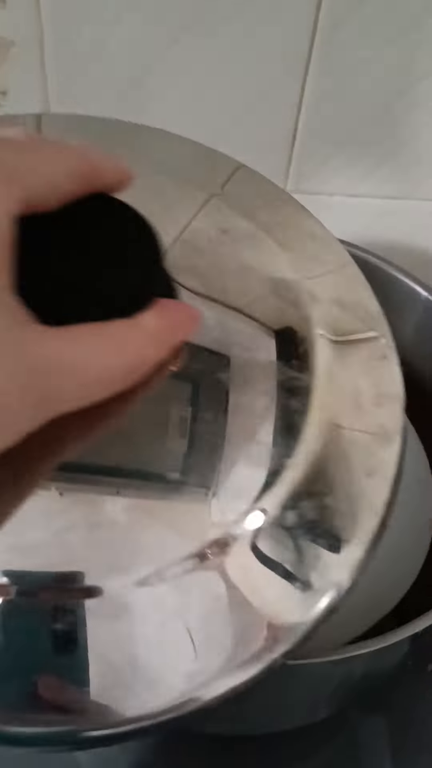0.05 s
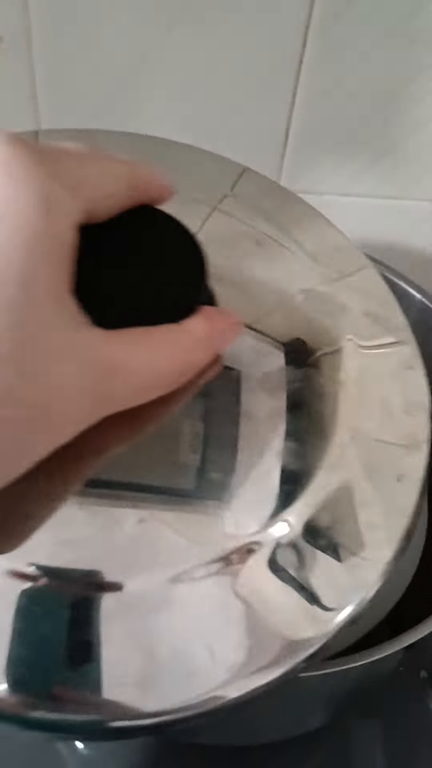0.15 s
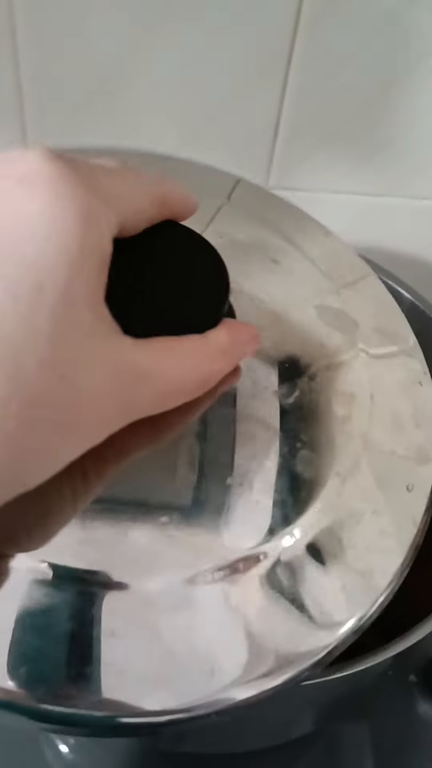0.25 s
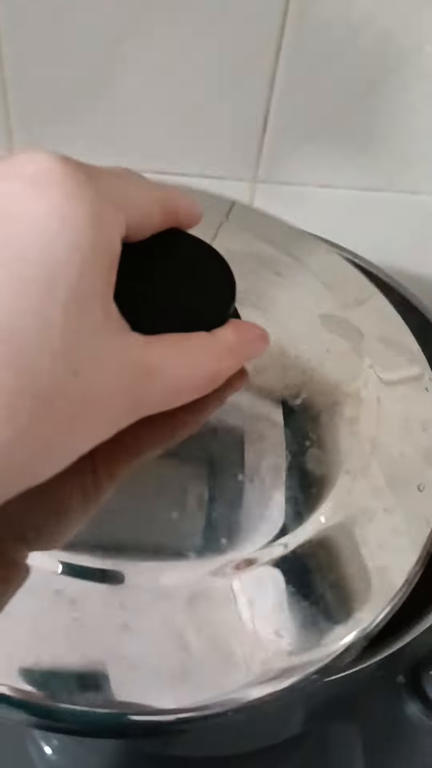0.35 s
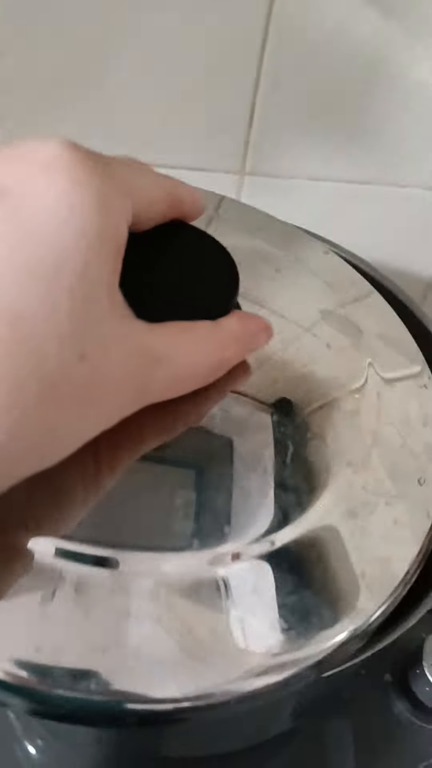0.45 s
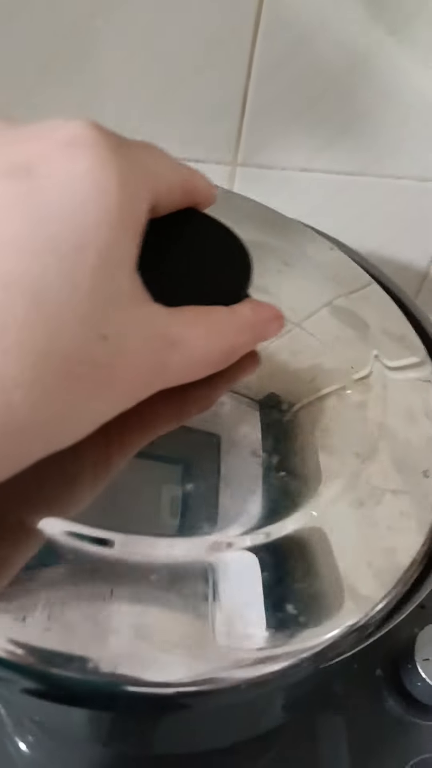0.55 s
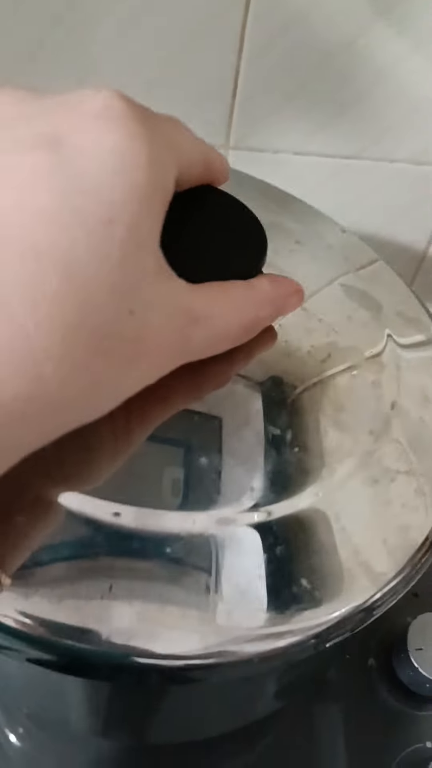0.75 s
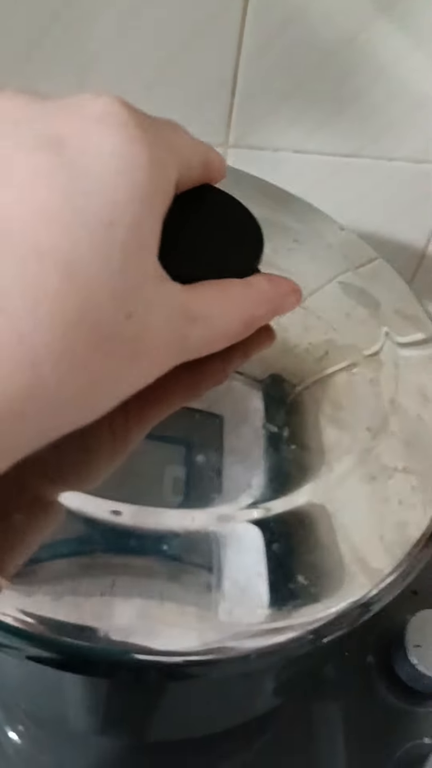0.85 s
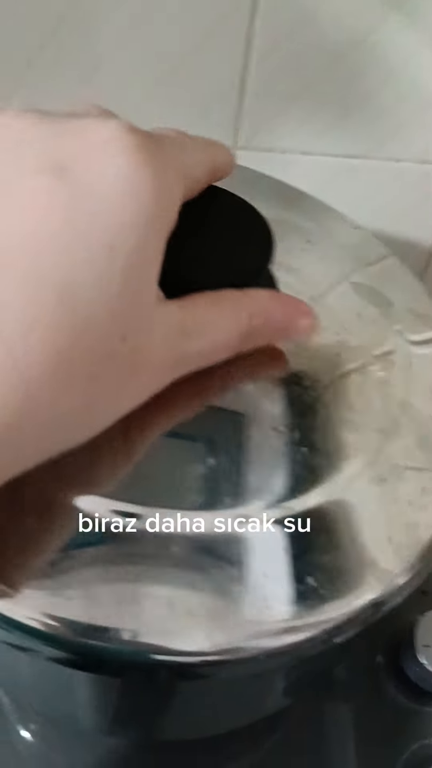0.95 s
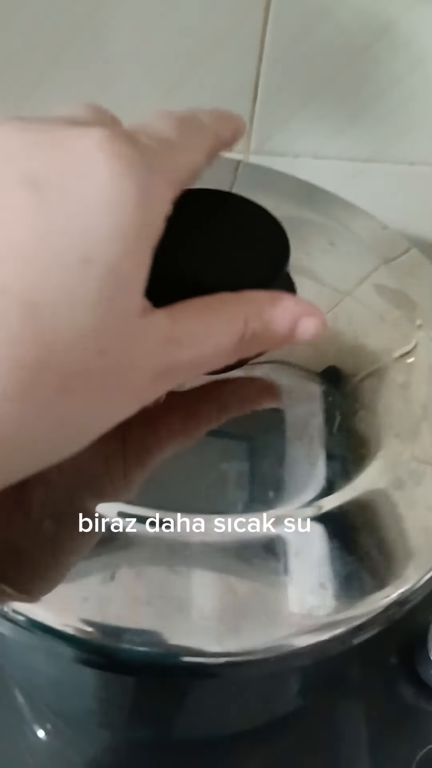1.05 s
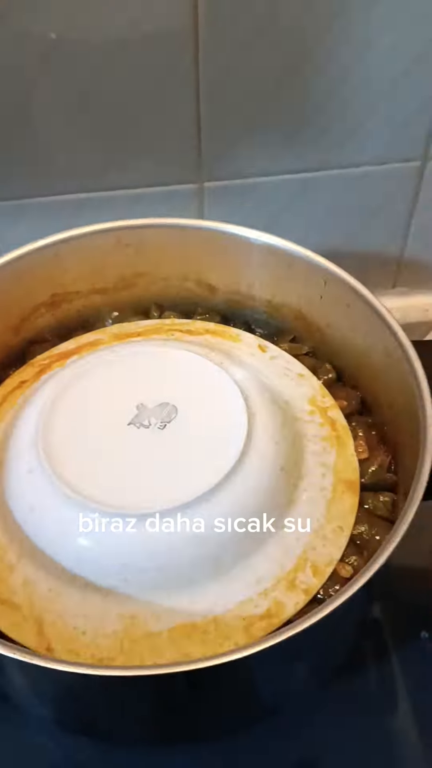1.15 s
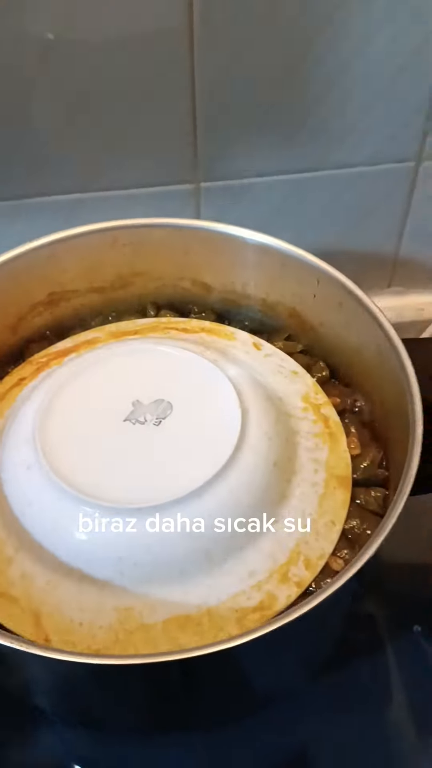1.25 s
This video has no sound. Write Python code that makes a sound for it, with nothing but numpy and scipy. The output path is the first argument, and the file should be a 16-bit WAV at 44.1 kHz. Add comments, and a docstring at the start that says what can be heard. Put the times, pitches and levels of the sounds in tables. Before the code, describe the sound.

A steel lid clanks on a pot's rim at about 0.25 and 0.4 seconds, then seats at 0.7, close by in a kitchen. The metal rings brightly between contacts while a hollow note falls. Faint nudges follow until 1 second, over soft stove hum and hiss. After a short dead silence, a quiet simmering rumble with a few tiny bubble pops runs from 1.15 to 1.3 seconds.

```python
"""A steel lid, held by its knob, is set on a pot in a tiled kitchen: two clinks on the rim, a third as it
seats, then small nudges. Each contact is a noisy clank; lid and pot ring between the blows, and the hollow note
of the air in the pot falls as the gap closes. The stove hums and hisses underneath. After a short silence the
scene changes: an open pot simmers with a low rumble and a few bursting bubbles."""
import sys
import numpy as np
from scipy import signal
from scipy.fft import rfft, irfft
from scipy.io import wavfile
from scipy.ndimage import uniform_filter1d

SR = 44100
rng = np.random.default_rng(int(sys.argv[2]) if len(sys.argv) > 2 else 0)


def materialize(psi):
    """Save the field psi as 16-bit PCM at rate SR to the path in sys.argv[1].

    A 1-D psi becomes a single channel; in a 2-D psi each row is a channel.
    """
    bounded = np.clip(np.atleast_2d(psi).T, -1, 1)
    quanta = np.round(bounded * 32767).astype(np.int16)
    wavfile.write(sys.argv[1], SR, quanta)


N = 57330
T = np.arange(N) / SR
FREQS = np.fft.rfftfreq(2 * N, 1 / SR)

# Levels are relative within a layer; pan is left minus right.
# tone of the stove's steady bed (frequency [Hz], level [dB])
STOVE_EQ = [(30, -33.5), (60, -12), (95, -3), (135, 1), (200, -13), (300, -10), (480, -18), (750, -24.5),
            (1100, -14.5), (1400, -23), (2100, -15), (2700, -23.5), (3600, -25), (5200, -29), (6000, -28),
            (8000, -23.5), (10000, -26), (12500, -30), (15000, -28.5)]
# its stereo lean (frequency [Hz], pan [dB])
STOVE_PAN = [(100, 1), (400, -1.5), (1300, -3), (2400, -4), (4400, -2.5), (8100, -17.5), (11000, 4),
             (15000, 2)]
# whistling bands in the hiss (centre [Hz], half-width [Hz], level [dB], pan [dB])
HISS_BANDS = [(1680, 83, -59.5, 0), (2260, 150, -65, -2), (4266, 150, -59.5, -5.5), (6737, 71, -56.5, -10)]
# hiss ducking under the blows as the recorder's gain drops, then coming back (time [s], level [dB])
HISS_DUCKING = [(0, 3), (.2, 5), (.4, -5), (.55, 8.5), (1.0, 8)]

# lid meets pot (time [s], clank [dB], treble shelf [dB], ring-out t60 [s], air note [dB])
BLOWS = [(.2430, 2.5, -6.5, 0.78, -8.5), (0.3812, 1, -3, 0.37, -13.5), (0.6903, -1.5, -2, .19, -19)]
# light chatter and nudges (time [s], clank [dB], treble shelf [dB], ring-out t60 [s], air note [dB])
TOUCHES = [(0.2564, -3, -14.5, 0.042, -37.5), (0.6867, -10.5, 0.5, 0.3, -30),
           (0.7019, -13, -11.5, 0.21, -24), (.836, -28.5, -11, 0.15, -32), (0.965, -26, -21.5, .12, -34.5),
           (0.989, -26.5, -9.5, .12, -39.5)]
# tone of a clank (frequency [Hz], level [dB])
CLANK_EQ = [(40, -78), (100, -56), (170, -59.5), (300, -49), (620, -50.5), (850, -48), (1200, -44.5),
            (1750, -49.5), (2250, -35.5), (2650, -52), (3000, -46), (3400, -58.5), (5000, -59), (6000, -63),
            (7300, -59), (9500, -65.5), (13000, -58), (15800, -61)]
# its stereo lean (frequency [Hz], pan [dB])
CLANK_PAN = [(150, 4), (400, -10), (650, 11.5), (1000, -1.5), (2000, 1.5), (3000, -6.5), (5000, -10.5),
             (8000, -14.5), (10000, 3), (13000, 7), (16000, -6.5)]
# modes of the lid against the rim, the lowest being thuds of the whole pot
# (frequency [Hz], t60 [s], pan [dB], fade-in [s], level at blow 1 [dB], at blow 2 [dB], at blow 3 [dB])
LID_MODES = [(99, 0.19, 1.5, 0.0092, -46, -51, -29), (160.8, 0.16, 2, .005, -22, -25, -33),
             (277.6, 0.17, 0.5, 0.0056, -30.5, -49, -27), (318.4, 0.1, 1, .003, -26, -42.5, -29),
             (739.6, 0.15, 3.5, .002, -20, -28, -51.5), (988, 0.13, -5.5, 0.0082, -46.5, -39.5, -22.5),
             (1134, 0.16, -9, 0.0017, -29.5, -37, -50.5), (1623, 0.4, 3.5, 0.0031, -31.5, -34.5, -36.5),
             (1785, .8, -7, 0.011, -42.5, -38.5, -52.5), (1930, 1, -4, 0.069, -22.5, -24.5, -39),
             (2088, 0.16, -5.5, 0.028, -26.5, -33.5, -7.5), (2210, .25, -11, .01, -33.5, -14.5, -45),
             (2220, 0.22, -7.5, 0.35, 17.5, -1, -10.5), (2264, 0.38, 0, 0.024, -29, -12.5, -42.5),
             (2333, 0.33, 3.5, 0.13, -9, -18.5, -43.5), (2443, 0.1, -10.5, 0.0045, -40.5, -26.5, -19),
             (2959, 0.14, -6, 0.0056, -20, -12.5, -57.5), (4300, .05, -6, .002, -44, -39.5, -23.5),
             (5015, .06, -9.5, .002, -49, -29, -23), (5400, .05, -6.5, .002, -43.5, -37.5, -23)]
# thin high overtones of the lid (frequency [Hz], level [dB])
LID_OVERTONES = [(4996, -34), (5075, -36.5), (5577, -46.5), (6019, -41), (6535, -38), (7300, -36),
                 (7460, -41.5), (7628, -51.5), (8333, -45), (9145, -46.5), (9819, -48), (11483, -45.5),
                 (12086, -57), (12565, -52.5), (13749, -52.5), (14998, -46)]
# the lid's main tone, a close pair that beats (frequency [Hz], pan [dB], level [dB])
WOBBLE_PAIR = [(2047.6, -1, -5), (2072.5, -2, 0)]
# strength of the pair at each blow (level [dB])
WOBBLE_DRIVE = [-3.5, 9, -23]
# pot modes, free until the lid closes (frequency [Hz], t60 [s], pan [dB], fade-in [s], choke time [s],
# pitch rise after blow 1 [fraction], level at blow 1 [dB], at blow 2 [dB])
POT_MODES = [(204.6, 2.5, -7, .06, 0.89, 0.006, -49, -40.5), (663.5, 1.08, 4.5, 0.72, .665, .06, -12, -8.5),
             (1306, 0.84, -12, 1, 0.663, 0.075, -14, 0), (2898, 1.5, -13, .03, .625, 0.037, -27.5, -34.5),
             (3902, 0.84, -10, 0.0083, .62, 0.0051, -27.5, -30)]

# air note, falling as the gap closes (time [s], pitch [Hz])
AIR_PITCH = [(.24, 592), (.39, 544.3), (.5, 510), (.69, 428), (.85, 397), (1.0, 370.6)]
# its breathy rush between blows (time [s], level [dB])
AIR_ENVELOPE = [(.2, -70), (.26, -42), (.43, -35), (.52, -42), (.6, -49), (.67, -48), (.71, -41),
                (.77, -52), (1.0, -52)]
# its drift from left to right (time [s], pan [dB])
AIR_PAN = [(.24, 2.5), (.45, 5.5), (.69, -8), (1.0, -8)]

# tone of the simmer (frequency [Hz], level [dB])
SIMMER_EQ = [(18, -58.5), (30, -36), (59, -51), (90, 3.5), (189, -15.5), (245, -0.5), (280, -16.5),
             (374, -8), (415, -15), (1130, -26.5), (1350, -23), (1630, -24), (2350, -27.5), (2610, -31.5),
             (16000, -55)]
# its loudness (time [s], level [dB])
SIMMER_ENVELOPE = [(1.148, -48), (1.175, -38.5), (1.22, -38), (1.25, -34), (1.3, -38.5)]
# bursting bubbles (time [s], pitch [Hz], level [dB])
BUBBLES = [(1.181, 3570, -47), (1.2415, 2350, -37), (1.264, 3600, -48)]

STOVE_DB, SHARED_BELOW_HZ = -43.5, 210
CRACK_DB, BURST_T60_S, TAIL_DB, TREBLE_HZ = 16, .075, -10.5, 3500
SHIMMER_FROM_HZ, SHIMMER_TOP_HZ, SHIMMER_SPACING_HZ, SHIMMER_DB = 3200, 11000, 132.5, -1
FIRST_OVERTONE_T60_S, OVERTONE_DB, OVERTONE_PAN_DB = .42, 4, -7
CONTACT_DAMP_S, SEATED_DB = .018, -5
RISE_S, CHOKE_S, CHOKE_BEND, BEND_S = .079, .007, .012, .03
AIR_WIDTH_HZ, LEFT_LAG_S = 35, .00009
ROOM_T60_S, RING_ROOM_DB, CLANK_ROOM_DB = .28, -22, -12
SILENCE_FROM_S, SILENCE_TO_S = 1.002, 1.148
TOP_HZ = 15900


def amp(db):
    """Decibels to gain."""
    return 10 ** (np.asarray(db) / 20)


def pan(db):
    """Left and right gains for a level difference."""
    return amp(np.array([[1], [-1]]) * db / 2)


def glide(points):
    """A value moving in straight lines between timed points."""
    return np.interp(T, *np.array(points).T)


def spectrum(points):
    """An EQ curve through (frequency [Hz], level [dB]) points."""
    hz, db = np.array(points).T
    return np.interp(np.log(FREQS + 1), np.log(hz), db)


def colour(x, db):
    """Minimum-phase EQ, so nothing sounds ahead of an attack."""
    fold = np.r_[1, np.full(N - 1, 2), 1, np.zeros(N - 1)]
    cepstrum = irfft(np.log(amp(db)))
    response = np.exp(rfft(cepstrum * fold))
    return irfft(rfft(x, 2 * N) * response)[..., :N]


def spread(x, pan_db):
    """Two noises become a stereo pair: shared in the bass, wide in the treble, leaning by band."""
    mid, side = rfft(x, 2 * N)
    apart = FREQS / np.hypot(FREQS, SHARED_BELOW_HZ)
    pair = (mid * np.sqrt(2 - apart ** 2) + np.array([[1], [-1]]) * side * apart) / np.sqrt(2)
    return irfft(pair * pan(pan_db))[:, :N]


def noise():
    """Two unrelated white noises."""
    return rng.standard_normal((2, N))


def unit(x):
    """Scale to rms 1."""
    return x / np.sqrt(np.mean(x ** 2))


def noise_band(hz, half_width):
    """Two unrelated narrow bands of noise at rms 1."""
    peak_db = -20 * np.log10(1 + ((FREQS - hz) / half_width) ** 2)
    return unit(colour(noise(), peak_db))


def fade(start, t60):
    """Exponential decay from a moment on."""
    return (T >= start) * np.exp(-np.log(1000) * np.maximum(T - start, 0) / t60)


def ring(start, hz, t60, fade_in, bend=0):
    """A mode that fades in and dies away, slightly late on the left; bend is a fraction of its pitch."""
    age = np.maximum(T - start, 0)
    bent_age = age + np.cumsum(bend * (T >= start)) / SR
    cycles = hz * (bent_age - np.array([[LEFT_LAG_S], [0]]))
    return np.sin(2 * np.pi * cycles) * fade(start, t60) * (1 - np.exp(-age / fade_in))


def damping(blow):
    """The next blow stops what is still ringing from this one."""
    if blow + 1 == len(BLOWS):
        return 1
    return np.exp(-np.maximum(T - BLOWS[blow + 1][0], 0) / CONTACT_DAMP_S)


def stove():
    """A bed of low hum and hiss, with a few narrow whistling bands on top."""
    bed = unit(colour(spread(noise(), spectrum(STOVE_PAN)), spectrum(STOVE_EQ)))
    whistles = sum(amp(db) * pan(side) * noise_band(hz, width) for hz, width, db, side in HISS_BANDS)
    return amp(STOVE_DB) * bed + whistles * amp(glide(HISS_DUCKING))


def clanks():
    """Steel on steel: a crack, a noisy burst, and a tail whose treble shimmers with thin partials."""
    out = 0
    shelf = FREQS ** 2 / (FREQS ** 2 + TREBLE_HZ ** 2)
    density = FREQS[1] / SHIMMER_SPACING_HZ
    partials = amp(SHIMMER_DB) * (rng.random(N + 1) < density) / np.sqrt(density)
    tail_tone = np.where(FREQS < SHIMMER_FROM_HZ, 1, partials)
    tail_tone /= np.hypot(1, (FREQS / SHIMMER_TOP_HZ) ** 2)
    for start, db, treble_db, t60, _ in BLOWS + TOUCHES:
        tail = irfft(rfft(rng.standard_normal((2, 2 * N))) * tail_tone)[:, :N]
        hit = noise() * fade(start, BURST_T60_S) + amp(TAIL_DB) * tail * fade(start, t60)
        hit /= 1 + amp(TAIL_DB)
        hit[0, int(start * SR)] += amp(CRACK_DB)  # the crack goes in the mid channel
        eq_db = spectrum(CLANK_EQ) + db + treble_db * shelf
        out += colour(spread(hit, spectrum(CLANK_PAN)), eq_db) * np.sqrt(SR / 2)
    return out


def lid_ring():
    """Body and shine of the lid: each blow meets another spot of the rim and favours other modes."""
    out = 0
    for blow, (start, _, _, ring_out, _) in enumerate(BLOWS):
        body = sum(amp(levels[blow]) * pan(side) * ring(start, hz, t60, fade_in)
                   for hz, t60, side, fade_in, *levels in LID_MODES)
        shine_t60 = FIRST_OVERTONE_T60_S * ring_out / BLOWS[0][3]
        shine = sum(amp(db + rng.standard_normal()) * ring(start, hz, shine_t60, fade_in=.00067)
                    for hz, db in LID_OVERTONES)
        out += (body + amp(OVERTONE_DB) * pan(OVERTONE_PAN_DB) * shine) * damping(blow)
    return out


def lid_wobble():
    """The lid's main tone beats, growing louder as the recorder's gain recovers after each blow."""
    out = 0
    for blow, drive_db in enumerate(WOBBLE_DRIVE):
        tone = sum(amp(drive_db + db) * pan(side) * ring(BLOWS[blow][0], hz, t60=.6, fade_in=.4)
                   for hz, side, db in WOBBLE_PAIR)
        floor = amp(SEATED_DB) if blow > 0 else 0  # once seated, it rings on more softly
        out += tone * np.maximum(damping(blow), floor)
    return out


def pot_ring():
    """The pot's ring comes up after the first two blows, as if the recorder's gain were recovering."""
    out = 0
    for hz, t60, side, fade_in, choke_at, rise, *levels in POT_MODES:
        # each tone bends up as the lid nears and chokes as it presses on the rim
        free = .5 - .5 * np.tanh((T - choke_at) / (2 * CHOKE_S))
        first_bend = rise * np.clip((T - BLOWS[0][0]) / RISE_S, 0, 1)
        second_bend = CHOKE_BEND * np.exp(np.minimum(T - choke_at, 0) / BEND_S)
        for blow, bend in enumerate((first_bend, second_bend)):
            tone = ring(BLOWS[blow][0], hz, t60, fade_in, bend)
            out += amp(levels[blow]) * pan(side) * tone * free * damping(blow)
    return out


def air_note():
    """The hollow, falling note of the air under the lid: knocked by every contact, stirred between."""
    hz = glide(AIR_PITCH)
    knocks = sum(amp(db) * ring(start, np.interp(start, T, hz), t60=.094, fade_in=.0014)
                 for start, *_, db in BLOWS + TOUCHES)
    flutter = noise_band(0, AIR_WIDTH_HZ)
    phase = 2 * np.pi * np.cumsum(hz) / SR
    rush = flutter[0] * np.cos(phase) + flutter[1] * np.sin(phase)  # noise riding on the pitch
    return (knocks + rush * amp(glide(AIR_ENVELOPE))) * pan(glide(AIR_PAN))


def kitchen(x, wet_db):
    """Short bright reverb from the tiles."""
    tail = noise() * fade(.004, ROOM_T60_S)
    tail /= np.sqrt(np.sum(tail ** 2) / 2)
    return x + amp(wet_db) * signal.fftconvolve(x, tail, axes=1)[:, :N]


def simmer():
    """The open pot rumbles and a few bubbles burst with tiny pings."""
    rumble = unit(colour(spread(noise(), 0), spectrum(SIMMER_EQ)))
    pops = sum(amp(db) * ring(start, hz, t60=.033, fade_in=.00072) for start, hz, db in BUBBLES)
    return rumble * amp(glide(SIMMER_ENVELOPE)) + pops


def scene():
    """The lid closing over the stove's hiss, a short silence, then the scene changes to a simmering pot."""
    rings = kitchen(lid_ring() + lid_wobble() + pot_ring(), RING_ROOM_DB)
    hits = kitchen(clanks() + air_note(), CLANK_ROOM_DB)
    closing = rings + hits + stove()
    gate_out = uniform_filter1d(1. * (T < SILENCE_FROM_S), size=64)
    gate_in = uniform_filter1d(1. * (T > SILENCE_TO_S), size=64)
    return closing * gate_out + simmer() * gate_in


def record(dry):
    """The phone rounds the loudest peaks and cuts the top."""
    rounded = np.tanh(0.57 * dry) / 0.62
    high_cut = signal.ellip(10, .2, 80, TOP_HZ, fs=SR, output="sos")
    return signal.sosfilt(high_cut, rounded)


dry = scene()
out = record(dry)
materialize(out)
```